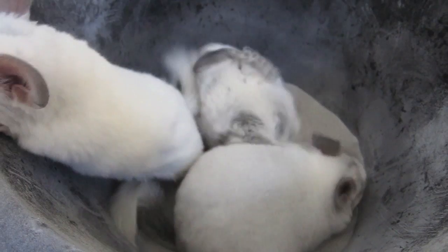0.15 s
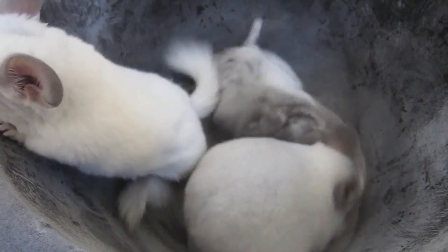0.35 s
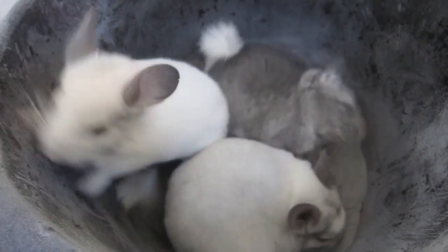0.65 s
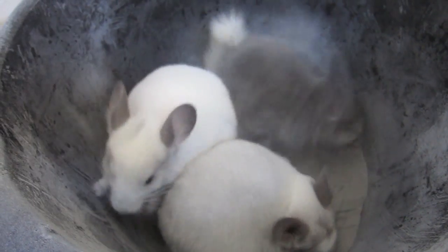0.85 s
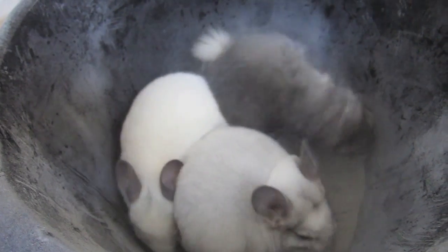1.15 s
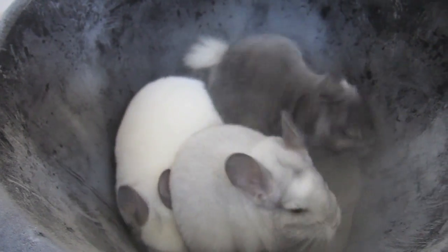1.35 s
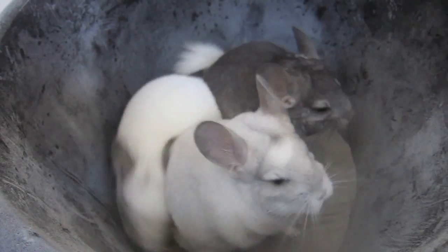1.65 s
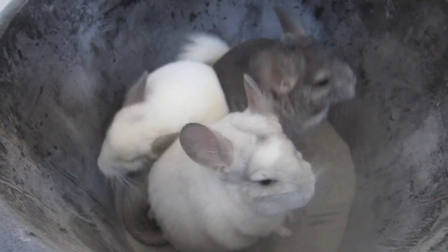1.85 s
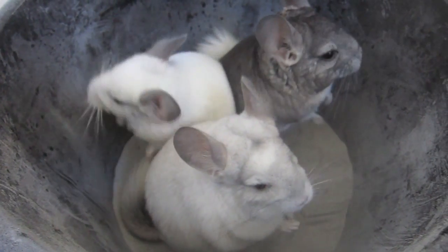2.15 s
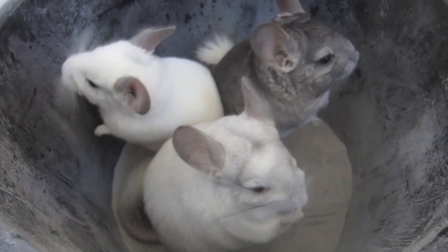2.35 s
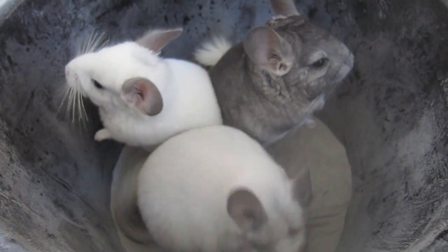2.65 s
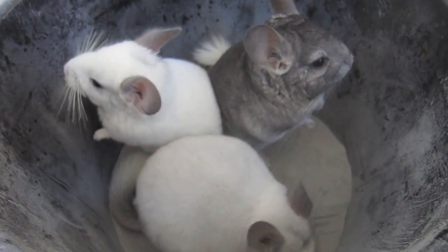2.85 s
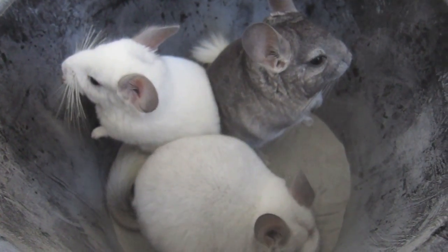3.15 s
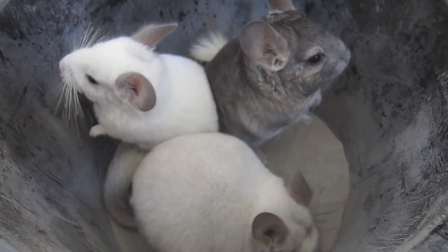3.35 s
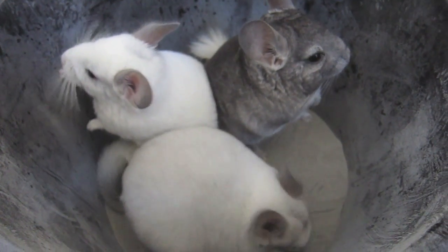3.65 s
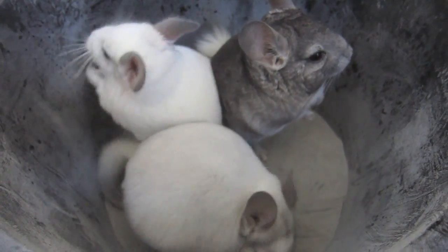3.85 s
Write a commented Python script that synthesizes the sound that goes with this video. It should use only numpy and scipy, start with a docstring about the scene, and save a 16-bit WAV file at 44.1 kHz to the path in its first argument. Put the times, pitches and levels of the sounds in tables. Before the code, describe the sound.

Chinchillas dust-bathe in a bucket: loud gritty swishing, paw scrapes, dull body thumps and a sharp knock early on, fading after about a second and a half to near quiet, with a light shuffle near the end; close microphone indoors.

```python
"""Chinchillas take a dust bath in a bucket: fur swishes through the dust as hiss that catches and slips.
Paws scrape in bursts of gritty noise; sharp ticks of noise are snapping grains and the knock's bright top.
Bodies roll as a low rumble; thumps, taps and a sharp knock make the bucket ring as fading sine waves.
They settle, shift a little, and near the end one shuffles again.
Dull echoes follow, over a quiet room of low noise, a steady hum and a faint whine."""
import sys
import numpy as np
from scipy import signal
from scipy.fft import rfft, irfft
from scipy.io import wavfile

SR = 44100
rng = np.random.default_rng(int(sys.argv[2]) if len(sys.argv) > 2 else 0)


def persist_wave(psi):
    """Save psi, clipped to +-1, as 16-bit WAV."""
    counts = np.round(np.clip(psi, -1, 1) * 32767).astype(np.int16)
    wavfile.write(sys.argv[1], SR, np.atleast_2d(counts).T)


N = 176400  # samples: 4 seconds
T = np.arange(N) / SR  # time of each sample [s]
FREQS = np.maximum(np.arange(N // 2 + 1) * SR / N, 1)  # frequency of each spectrum bin [Hz]

# How strongly fur rubs through the dust: (time [s], level [dB])
SWISH_LEVEL = [(0, -39), (.12, -39), (.19, -40.5), (.26, -39.5), (.32, -45.5), (.37, -39.5), (.46, -40),
               (.53, -36.5), (.61, -40), (.92, -42), (1.27, -40.5), (1.37, -46.5), (1.46, -52.5),
               (1.65, -61), (1.8, -55.5), (1.88, -58), (2.1, -59), (2.21, -49), (2.3, -61), (2.38, -59),
               (2.55, -62.5), (3.43, -66), (3.49, -46.5), (3.6, -47), (3.7, -48), (3.78, -53.5),
               (3.85, -52), (3.91, -58), (4, -56)]
# How alike the dust and the rolling are in both ears: (frequency [Hz], likeness [-1 to 1])
NEAR_LIKENESS = [(60, 0.88), (300, 1), (640, 1), (1400, 0.83), (3100, 0.36), (7000, 0), (15000, -.15)]


def from_db(db):
    """Turn decibels into a gain."""
    return 10 ** (np.asarray(db) / 20)


def rms_one(x):
    """Scale to an rms (average strength) of 1."""
    return x / np.sqrt(np.mean(x ** 2) + 1e-20)


def level(rows):
    """Draw a gain over time through (time [s], level [dB]) points."""
    return from_db(np.interp(T, *np.transpose(rows)))


def over_hz(points):
    """Join (frequency [Hz], value) points along a log-frequency axis."""
    hz, value = np.transpose(points)
    return np.interp(np.log(FREQS), np.log(hz), value)


def pan(db):
    """Left and right gains whose levels differ by db; below zero leans right."""
    return from_db(np.array([[db], [-db]]) / 2)


def flicker(depth_db, rate_hz):
    """A random gain of mean power 1 that changes at about this rate."""
    slow = irfft(rfft(rng.standard_normal(N)) / (1 + (FREQS / rate_hz) ** 4), N)
    swing = np.clip(rms_one(slow), -3, 3)
    return rms_one(from_db(depth_db * swing))


def decay(pulses, fall_s):
    """Let each pulse die away exponentially."""
    tiny = 1e-18  # keeps the filter from slowing down on near-zero numbers
    return signal.lfilter([1], [1, -np.exp(-1 / (fall_s * SR))], pulses + tiny)


def noise(envelope, colour, likeness):
    """Shape random noise over time, colour its spectrum and make it partly alike in both ears."""
    shaped = rng.standard_normal((2, N)) * envelope
    mid, side = rfft(shaped) * rms_one(from_db(over_hz(colour)))
    alike = np.clip(over_hz(likeness), -.99, .99)
    shared = np.sqrt(1 + alike) * mid
    opposed = np.sqrt(1 - alike) * side * [[1], [-1]]
    return irfft(shared + opposed, N)


def strike(s, blow_db, modes, contact_s, pitch=1, spread_db=0):
    """A blow swells over its contact time and rings the modes; where it lands shifts their mix."""
    age = T[:SR // 4]
    hz, db, t60 = np.transpose(modes)[:, :, None]
    mix_db = spread_db * rng.standard_normal(db.shape)
    fading = from_db(db + mix_db - 60 * age / t60)  # t60: time to fall by 60 dB
    rings = fading * np.sin(2 * np.pi * hz * pitch * age)
    swell = 1 - np.exp(-age / contact_s)
    out = np.zeros(N + SR // 4)
    start = int(s * SR)
    out[start:start + len(age)] = from_db(blow_db) * rings.sum(0) * swell
    return out[:N]


def room_tone():
    """Low indoor rumble from coloured noise, with a hum and a thin whine from steady sine waves."""
    # Hum and whine: (frequency [Hz], rms level [dB])
    tones = [(76, -53.5), (120, -53), (439, -66.5), (8810, -78.5)]
    # Spectrum shape of the rumble: (frequency [Hz], relative level [dB])
    rumble_colour = [(12, -34), (20, -8.5), (116, -3), (190, -10), (360, -15.5), (434, -18.5), (624, -20),
                     (759, -22.5), (2200, -31), (8000, -42), (16000, -43.5)]
    # How alike the rumble is in both ears: (frequency [Hz], likeness [0-1])
    rumble_likeness = [(60, 0.67), (150, 0.8), (380, 0.35), (1000, 0.093), (6000, 0.075)]
    sines = 0
    for hz, db in tones:
        phase = rng.random()  # in cycles
        sines = sines + from_db(db) * np.sqrt(2) * np.sin(2 * np.pi * (hz * T + phase))
    return noise(from_db(-49.95), rumble_colour, rumble_likeness) + sines


def echoes(x):
    """Dense, dull reflections from the bucket and the room, different in each ear."""
    delay_s, t60_s, cut_hz, echo_db = 0.009, 0.38, 3400, -16.5
    age = T[:SR // 2] - delay_s
    low_pass = signal.butter(2, cut_hz, fs=SR, output="sos")
    tail = signal.sosfilt(low_pass, rng.standard_normal((2, len(age))))
    tail *= (age > 0) * from_db(-60 * age / t60_s)
    tail *= np.sqrt(4 * cut_hz / SR / np.sum(tail ** 2))  # same total strength for every random tail
    return from_db(echo_db) * signal.fftconvolve(x, tail, axes=1)[:, :N]


def rolling():
    """A soft body rumbles unevenly over the bucket floor: low noise with a random flutter."""
    # Body weight on the floor: (time [s], level [dB])
    roll_level = [(0, -49), (.34, -47.5), (.43, -34), (.55, -51.5), (.75, -37), (.9, -43), (1.08, -34),
                  (1.2, -39), (1.36, -42.5), (1.47, -55.5), (2.1, -69), (2.25, -48), (2.42, -67),
                  (3.38, -71), (3.55, -52.5), (3.72, -49.5), (4, -60)]
    # Spectrum shape of the rumble: (frequency [Hz], relative level [dB])
    roll_colour = [(25, -14), (75, -1.5), (135, 2.5), (200, -1.5), (300, 2.5), (430, -12.5), (620, -13),
                   (1000, -42.5)]
    flutter = flicker(depth_db=5.5, rate_hz=23)
    return noise(level(roll_level) * flutter, roll_colour, NEAR_LIKENESS)


def floor_thumps():
    """Bodies thump the bucket floor, which rings briefly at a pitch that shifts with the load."""
    # Thumps: (time [s], level [dB], pitch [Hz])
    thumps = [(.097, -16.5, 306), (0.3864, -11, 406), (0.39, -15.5, 218), (.415, -26, 242),
              (0.578, -18.5, 299), (0.65, -12.5, 285), (0.69, -21.5, 312), (0.725, -12.5, 258),
              (.767, -25, 283), (.826, -20.5, 320), (.845, -13, 291), (.935, -22, 315), (.956, -19.5, 274),
              (1.016, -21, 303), (1.045, -16.5, 316.4), (1.071, -15.5, 290), (1.143, -24.5, 167),
              (1.156, -24, 268), (1.193, -23, 85.4), (1.251, -22, 290), (1.342, -24, 336),
              (1.358, -20.5, 257), (2.241, -29.5, 227), (2.267, -32, 227), (2.339, -31, 302),
              (3.591, -36, 215), (3.708, -36, 208), (3.941, -27.5, 303)]
    # Ways the floor rings: (multiple of the thump's pitch, level [dB], time to fall 60 dB [s])
    floor_modes = [(1, 1.5, 0.064), (.6, -8.5, 0.067), (1.9, -17, 0.046)]
    floor_db, contact_s = -0.5, 0.0022
    return sum(strike(s, db + floor_db, floor_modes, contact_s, pitch=hz, spread_db=2.5)
               for s, db, hz in thumps)


def wall_taps():
    """Paws give the bucket wall padded taps that ring it briefly."""
    # Taps: (time [s], level [dB])
    taps = [(.073, -21), (.104, -16.5), (.155, -18.5), (.298, -16.5), (.389, -7), (.405, -23), (.507, -21),
            (.577, -25), (.651, -25), (.724, -20), (.827, -17), (.853, -16.5), (.958, -23), (1.045, -27),
            (1.062, -21), (1.143, -21), (1.343, -28), (2.209, -30), (2.339, -33), (3.941, -24)]
    # Ways the wall rings: (frequency [Hz], level [dB], time to fall 60 dB [s])
    wall_modes = [(589, -5, 0.044), (652, -2, .035), (745, -2, 0.025), (1230, -32, 0.037)]
    wall_db, contact_s = -4.5, 0.0019
    return sum(strike(s, db + wall_db, wall_modes, contact_s, spread_db=2.5) for s, db in taps)


def hard_knocks():
    """Hard, very short contacts with the wall give a fast-dying crack and a longer boom."""
    # One sharp knock and a much fainter one: (time [s], level [dB])
    knocks = [(0.3786, -8.5), (2.3386, -33)]
    # Boom and crack: (frequency [Hz], level [dB], time to fall 60 dB [s])
    crack_modes = [(216.5, -10.5, 0.14), (373, -15.5, 0.14), (454, -14, 0.073), (690, -12.5, 0.045),
                   (734, -17.5, 0.17), (1566, -5, 0.02), (1850, 1, 0.0076), (2520, 1.5, 0.0042)]
    return sum(strike(s, db, crack_modes, contact_s=0.0001) for s, db in knocks)


def patchy(x):
    """The contact keeps changing, so each quarter octave swells and fades by itself."""
    spectrum = rfft(x)
    place = np.clip(4 * np.log2(FREQS / 500), 0, 19)  # quarter octaves above 500 Hz
    mixed = 0
    for k in range(20):
        band = irfft(spectrum * np.maximum(1 - abs(place - k), 0), N)  # overlaps its neighbours
        mixed = mixed + band * flicker(depth_db=2, rate_hz=29)
    return mixed


def brighten(x):
    """Turn the treble up or down over time: light shuffling sounds brighter than heavy rolling."""
    # Gain of the treble in the dust: (time [s], level [dB])
    dust_treble = [(.2, -4), (.7, -5.5), (2.2, -2.5), (3.5, 0.5)]
    treble_from_hz = 2300
    treble = irfft(rfft(x) / (1 + (treble_from_hz / FREQS) ** 6), N)
    return x + treble * (level(dust_treble) - 1)


def sharp_ticks():
    """Tiny noise bursts: the knock's bright top, snapping grains, and a sprinkle that follows the rubbing."""
    # The bright top of the sharp knock (first row), then coarse grains snapping: (time [s], level [dB])
    ticks = [(.3785, -12), (.809, -19), (0.854, -20), (2.05, -42), (2.63, -44), (2.747, -39.5),
             (2.841, -39), (3.592, -36.5), (3.862, -33)]
    # Spectrum shape of a tick: (frequency [Hz], relative level [dB])
    tick_colour = [(300, -23), (1500, -1), (4500, 3.5), (7000, -8.5), (11000, -2.5), (15000, -16)]
    loose_per_s, loose_db, spread_db, ring_s = 120, -1.5, 1.5, 0.0012
    sizes = from_db(loose_db + spread_db * np.minimum(rng.exponential(1, N), 3))
    pulses = (rng.random(N) < loose_per_s / SR) * sizes * level(SWISH_LEVEL)
    for s, db in ticks:
        pulses[int(s * SR)] += from_db(db) / 2
    return noise(decay(pulses, ring_s), tick_colour, NEAR_LIKENESS)


def paw_scrapes():
    """Each paw stroke in the dust bites at once and trails off in coarse grit."""
    # Strokes: (start [s], length [s], level [dB])
    scrapes = [(0.066, 0.019, -32), (0.092, 0.014, -34), (0.146, 0.0088, -32.5), (0.2094, .005, -32),
               (0.2183, .011, -33.5), (.238, 0.013, -33.5), (0.5045, 0.01, -27), (0.57, 0.0096, -31),
               (.6515, 0.0097, -28), (0.764, 0.013, -34), (0.814, 0.017, -40.5), (0.8531, 0.0083, -24),
               (0.937, 0.0034, -44), (0.9557, 0.0077, -34.5), (1.014, .007, -35), (1.0403, 0.005, -28.5),
               (1.0612, 0.011, -28.5), (1.126, 0.016, -39), (1.17, 0.0052, -34), (1.213, .005, -38),
               (1.2362, 0.0049, -33), (1.2486, 0.01, -35), (1.342, 0.01, -35), (1.976, 0.0045, -42.5),
               (2.167, 0.023, -51), (2.204, 0.006, -40.5), (2.225, .004, -44.5), (3.4362, 0.016, -47.5),
               (3.483, 0.0073, -40), (3.547, 0.0092, -41.5), (3.5904, 0.0047, -33), (3.62, .009, -38.5),
               (3.6317, 0.0065, -34.5), (3.7016, 0.0088, -38.5), (3.721, 0.012, -43), (3.9392, 0.013, -41)]
    # Spectrum shape of a scrape: (frequency [Hz], relative level [dB])
    scrape_colour = [(200, -29), (650, 9), (1000, 0), (1500, 6), (2200, 4.5), (3000, 4.5), (4500, 0.5),
                     (7000, -7.5), (10500, -17.5), (15000, -19)]
    rise_s = 0.0011
    strokes = 0
    for s, length, db in scrapes:
        age = np.maximum(T - s, 0)
        bite = np.minimum(age / rise_s, 1)
        trail = 1 / (1 + (age / length) ** 4)
        strokes = strokes + from_db(db) * bite * trail
    grit = flicker(depth_db=1.5, rate_hz=940)
    return noise(strokes * grit, scrape_colour, NEAR_LIKENESS)


def fur_swish():
    """Fur drags through the dust: a hiss that keeps catching and slipping on top of a steady slide."""
    # Spectrum shape of the hiss: (frequency [Hz], relative level [dB])
    swish_colour = [(200, -5), (400, -4.5), (650, -1), (1000, -4), (1700, -4.5), (3000, -5), (5000, -6),
                    (7000, -12), (10500, -14), (15000, -20)]
    catches_per_s, fall_s, largest_catch = 150, 0.009, 0.77  # size compared with the slide
    catches = (rng.random(N) < catches_per_s / SR) * rng.random(N) * largest_catch
    drag = rms_one(1 + decay(catches, fall_s))  # the 1 is the steady slide
    return noise(level(SWISH_LEVEL) * drag, swish_colour, NEAR_LIKENESS)


def scene():
    """The animals in the bucket, their echoes and the room."""
    dust = brighten(patchy(fur_swish() + paw_scrapes() + sharp_ticks())) * pan(-0.5)
    bucket = (floor_thumps() + wall_taps() + hard_knocks() + rolling()) * pan(-1.1)
    return dust + bucket + echoes(dust + bucket) + room_tone()


def record(dry):
    """The microphone has a narrow notch in the treble; the top is cut."""
    notch_hz, notch_width_hz, notch_db, cutoff_hz = 8175, 454, -21.5, 15750
    notch = from_db(notch_db * np.exp(-((FREQS - notch_hz) / notch_width_hz) ** 4))
    top = 1 / np.sqrt(1 + (FREQS / cutoff_hz) ** 400)  # a very steep cut
    return irfft(rfft(dry) * notch * top, N)


dry = scene()
out = record(dry)
persist_wave(out)
```